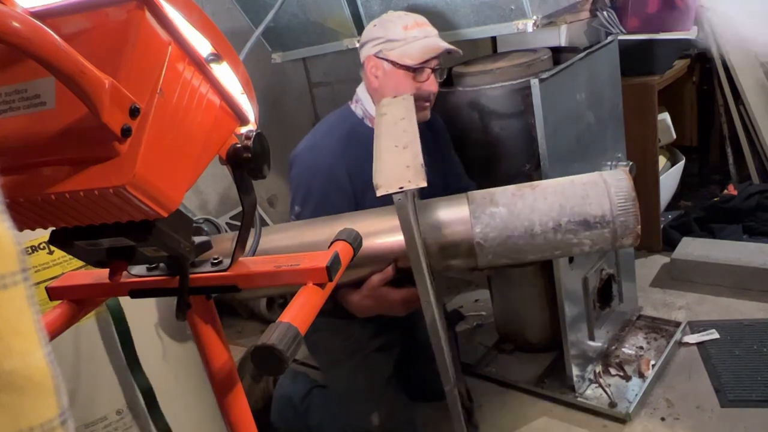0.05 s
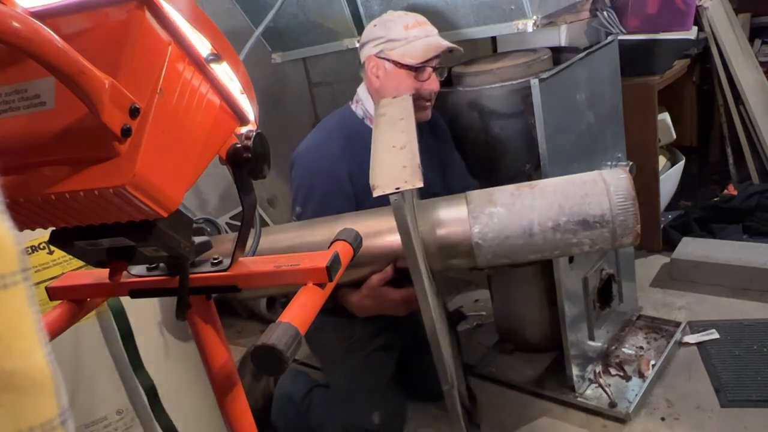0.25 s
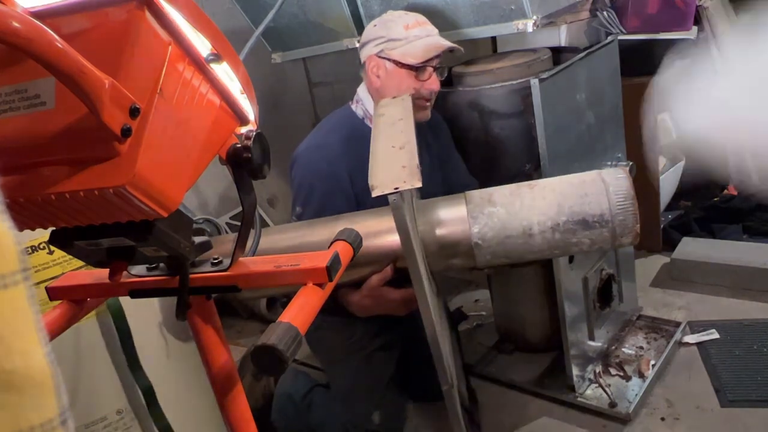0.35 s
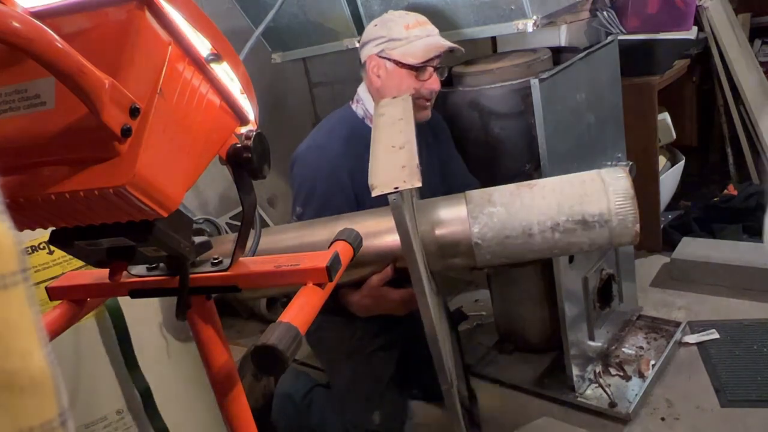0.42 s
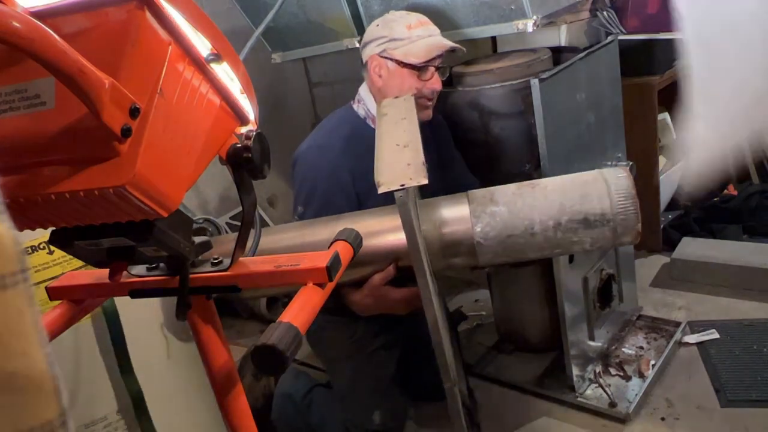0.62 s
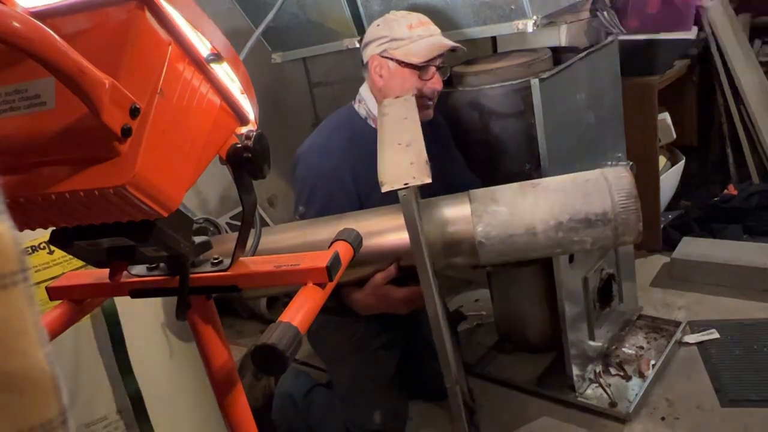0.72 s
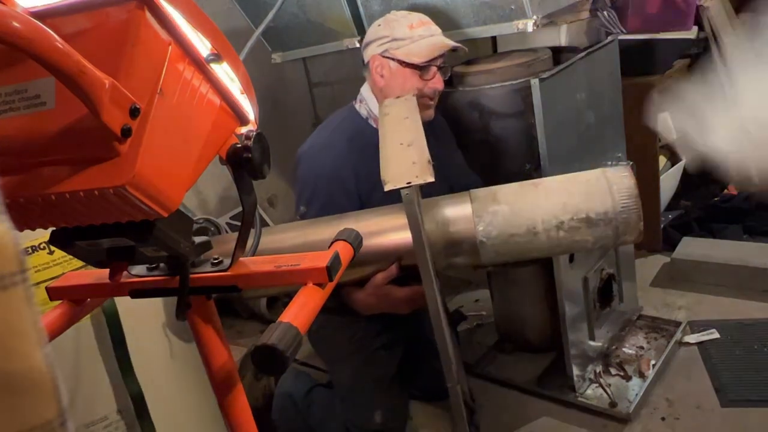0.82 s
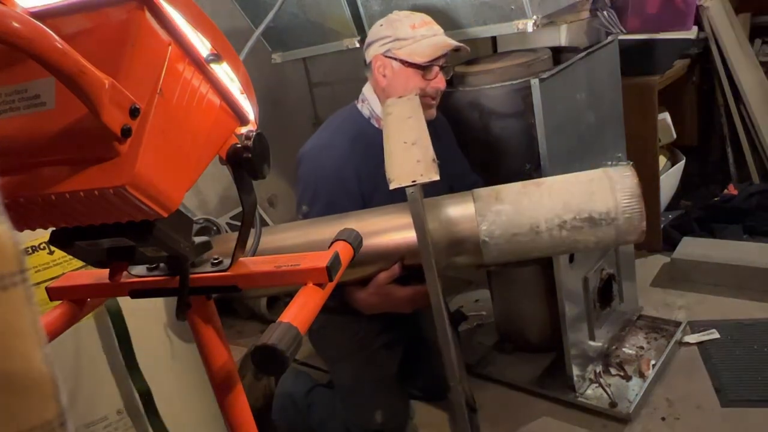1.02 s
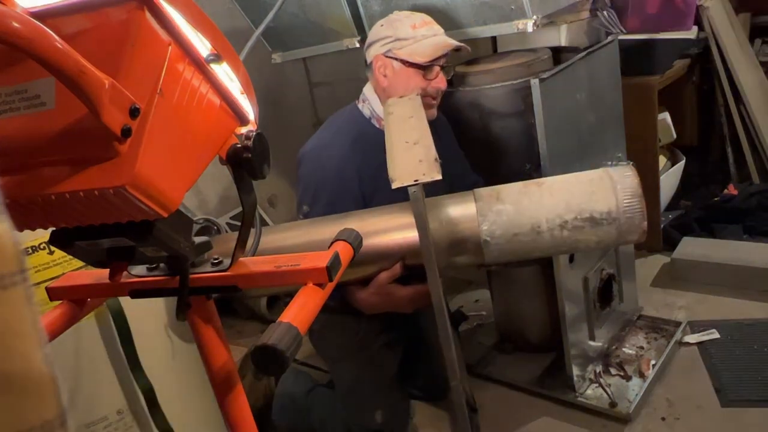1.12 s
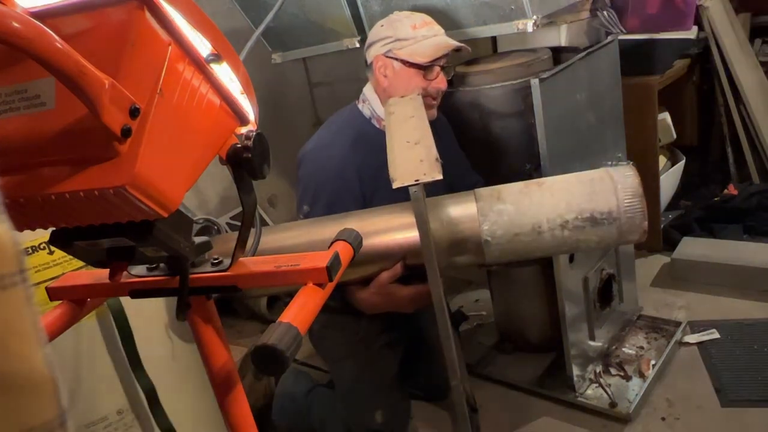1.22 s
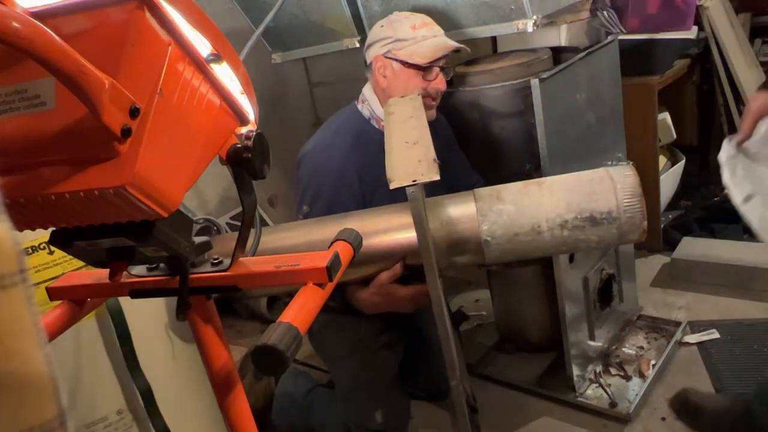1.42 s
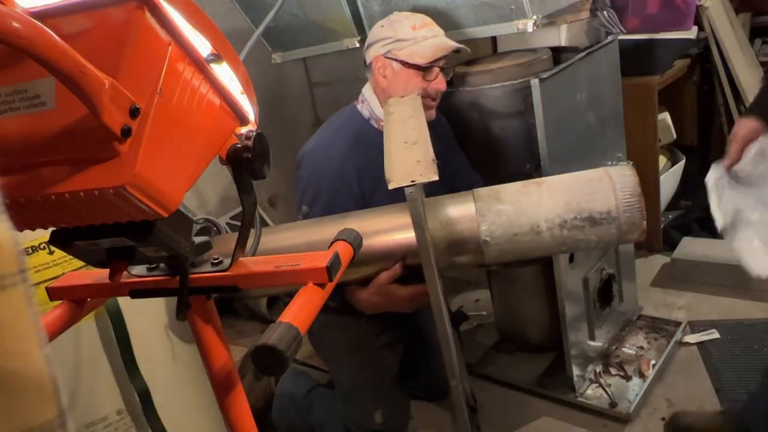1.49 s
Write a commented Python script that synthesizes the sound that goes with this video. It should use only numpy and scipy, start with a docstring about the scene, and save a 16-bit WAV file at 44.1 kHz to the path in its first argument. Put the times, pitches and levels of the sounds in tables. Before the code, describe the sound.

Two shoves on a stuck sheet-metal pipe joint: gritty scraping, a sharp crack, booming rattle, thin squeaking, another clatter, then a dull bump over low hum and light rustle, heard close in a small room.

```python
"""Over a low hum and a light rustle in a small basement, the joint of a stove pipe starts to scrape. A first
shove cracks it loose: the edges clash, the pipe knocks and rings, the thin wall booms. The joint squeaks
faintly and groans until a second shove sets off another crack and rattle. Last, the rustle starts to fade and a
soft bump follows. Slips are random impulses, clashes, cracks and rustle shaped noise, rings and booms damped
modes, thuds gliding sines, squeak and groans wavering ones."""
import sys
import numpy as np
from scipy import signal
from scipy.fft import rfft, irfft, next_fast_len
from scipy.io import wavfile
from scipy.ndimage import map_coordinates

SR = 44100
rng = np.random.default_rng(int(sys.argv[2]) if len(sys.argv) > 2 else 0)


def master(y):
    """Save y as 16-bit WAV."""
    cut = np.clip(np.atleast_2d(y).T, -1, 1)
    pcm = np.round(cut * 32767)  # scale
    wavfile.write(sys.argv[1], SR, pcm.astype(np.int16))


N = 68355  # samples


def amp(db):
    """Decibels to gain."""
    return 10 ** (np.asarray(db) / 20)


def unit(x):
    """Scaled to rms 1."""
    return x / np.sqrt(np.mean(x ** 2) + 1e-20)


def along(points, hz):
    """Values read off (frequency, value) points on a log frequency axis."""
    f, v = np.transpose(points)
    return np.interp(np.log(hz + 1), np.log(f + 1), v)


def curves(rows):
    """One value per sample for each column after the time."""
    s, *columns = np.transpose(rows)
    return [np.interp(np.arange(N) / SR, s, column) for column in columns]


def wobble(rate):
    """A continuous random curve, rate knots a second."""
    return map_coordinates(rng.standard_normal(4096), [np.arange(N) * rate / SR], mode="mirror")


def filtered(x, response):
    """x shaped by a response of frequency."""
    m = next_fast_len(N + SR // 2)
    hz = np.fft.rfftfreq(m, 1 / SR)
    return irfft(rfft(x, m) * response(hz), m)[..., :N]


# stereo width: (frequency [Hz], left-right likeness [0 to 1])
ALIKE = [(100, 0.96), (250, 0.87), (600, 0.24), (2000, 0.057), (4500, 0.24), (8000, 0.28), (13000, 0.88)]


def mid_side_gains(hz):
    """Mid and side gains that make left and right as alike as the table asks."""
    turn = np.arccos(np.clip(along(ALIKE, hz), -1, 1)) / 2
    return np.array([np.cos(turn), np.sin(turn)])


def stereo(pair, spectrum):
    """Two unrelated signals become a coloured, partly alike left and right of rms 1."""
    mid, side = filtered(pair, lambda hz: amp(along(spectrum, hz)) * mid_side_gains(hz))
    return unit(np.array([mid + side, mid - side]))


def noise(spectrum):
    """Coloured stereo noise of rms 1."""
    return stereo(rng.standard_normal((2, N)), spectrum)


def tail(x, t60s, count=12):
    """A dense ring, new for each stretch of sound; each frequency dies at its own speed."""
    out = np.zeros((2, N))
    for k in range(count + 1):
        # overlapping triangles cross-fade from one stretch to the next
        share = np.maximum(1 - np.abs(np.arange(N) * count / N - k), 0)
        hz, t, z = signal.stft(rng.standard_normal((2, SR // 3)), SR, nperseg=256)
        decay = amp(-60 * t / along(t60s, hz)[:, None])
        mid, side = signal.istft(z * mid_side_gains(hz)[:, :, None] * decay, SR, nperseg=256)[1]
        answer = np.array([mid + side, mid - side])
        answer = answer / np.linalg.norm(answer[0])
        inside = np.flatnonzero(share)
        start = inside[0]
        ring = signal.fftconvolve((x * share)[:, inside], answer, axes=1)[:, :N - start]
        out[:, start:][:, :ring.shape[1]] += ring
    return out


def bursts(blows, attack_s, hold_s, t60_s):
    """Joint envelope of (s, dB) blows, added in power: attack, hold, decay."""
    s, db = np.transpose(blows)[:, :, None]
    age = np.maximum(np.arange(N) / SR - s, 0)
    attack = 1 - np.exp(-age / attack_s)
    decay = amp(db - 60 * np.maximum(age - hold_s, 0) / t60_s)
    return np.linalg.norm(attack * decay, axis=0)


def thuds(blows, attack_s, t60_s, bend, settle_s):
    """Each (s, dB, Hz) blow is a few damped swings that start sharp and sag to their pitch."""
    out, t = np.zeros(N + SR), np.arange(SR // 4) / SR
    envelope = (1 - np.exp(-t / attack_s)) * amp(-60 * t / t60_s)
    for s, db, hz in blows:
        # the pitch starts at (1 + bend) times hz
        cycles = hz * (t + bend * settle_s * (1 - np.exp(-t / settle_s)))
        out[round(s * SR):][:len(t)] += amp(db) * envelope * np.sin(2 * np.pi * cycles)
    return out[:N]


def struck(blows, modes, attack_s, scatter_db, detune):
    """Each (s, dB) blow rings the modes anew, a little differently in level and pitch."""
    out, t = np.zeros(N + SR), np.arange(SR // 2) / SR
    hz, level, t60 = np.transpose(modes)[:, :, None]
    for s, db in blows:
        size, shift = rng.standard_normal((2, len(modes), 1))
        decay = amp(db + level + scatter_db * size - 60 * t / t60)
        ring = decay * np.sin(2 * np.pi * hz * (1 + detune * shift) * t)
        out[round(s * SR):][:len(t)] += ring.sum(0) * (1 - np.exp(-t / attack_s))
    return out[:N]


# sliding of the joint, before the contact gain: (time [s], level [dB])
SLIDE = [(0, -43), (.08, -44), (.106, -40), (.15, -45.5), (.195, -43.5), (.222, -30), (.246, -23),
         (.31, -30.5), (.375, -37.5), (.41, -37.5), (.52, -45.5), (.575, -45), (.6, -41), (.65, -51),
         (.69, -41.5), (.735, -32), (.76, -38), (.772, -25), (.815, -29), (.875, -43), (.955, -38),
         (1.04, -60.5), (1.15, -97)]
# colour of the scrape, bass then the rest: (frequency [Hz], relative level [dB per Hz])
SCRAPE_LOW = [(40, -12), (120, -10), (250, -3.5)]
SCRAPE = [(500, -2.5), (1100, -1), (2000, -2), (3300, -5), (5500, -3.5), (8000, -4.5), (12000, -11.5)]
SLIPS_PER_S, SLIP_SPREAD_DB = 6000, 3
JUDDER_DB, JUDDER_PER_S = 1.2, 110


def scrape():
    """The joint slides in thousands of tiny slips, juddering as it goes; it has little bass."""
    level_db, = curves(SLIDE)
    slip_size = amp(SLIP_SPREAD_DB * rng.standard_normal(N))
    slips = (rng.random(N) < SLIPS_PER_S / SR) * slip_size
    grit = stereo(slips * rng.standard_normal((2, N)), SCRAPE_LOW + SCRAPE)
    return grit * amp(level_db + JUDDER_DB * wobble(JUDDER_PER_S))


# metal-on-metal knocks; the clash comes before the contact gain:
# (time [s], clash of the edges [dB], thud of the wall [dB], settled thud pitch [Hz])
KNOCKS = [(0.098, -42, -34.5, 276), (.2, -43, -31, 199), (.2535, -23, -9, 270), (.2665, -25, -12, 190),
          (0.291, -25, -30, 243), (.301, -32, -16, 205), (.312, -28, -15, 210), (.329, -33, -15, 200),
          (.345, -32, -28, 300), (0.361, -32.5, -24, 276), (.39, -36.5, -27, 322), (.414, -40.5, -23, 197),
          (.46, -39, -27, 278), (0.481, -42, -28, 195), (.588, -38, -34, 230), (0.713, -32, -32, 216),
          (.73, -29, -13.5, 326), (.739, -29, -17, 272), (0.756, -32, -22, 293), (.7688, -23, -14, 205),
          (.7805, -31.5, -9.5, 190), (.8, -24.5, -24, 198), (0.8055, -32, -17, 220),
          (.827, -25, -20.5, 355), (.8325, -34, -12, 210), (0.858, -56, -23.5, 260),
          (0.92, -37.5, -48, 259), (.953, -42, -32.5, 278), (.97, -61, -31.5, 189)]
# colour of the clash, bass then the rest: (frequency [Hz], relative level [dB per Hz])
CLASH_LOW = [(60, -28), (130, -26), (190, -2), (280, 0)]
CLASH = [(500, 4), (1200, -1.5), (2200, -3.5), (4000, -5), (7000, -8), (12000, -16)]


def clashes():
    """At each knock the loose edges chatter for a moment and settle."""
    blows = [(s, clash_db) for s, clash_db, _, _ in KNOCKS]
    return bursts(blows, attack_s=.0005, hold_s=.0079, t60_s=.073) * noise(CLASH_LOW + CLASH)


# dense upper modes of the wall: (frequency [Hz], t60 [s])
SHEET_T60 = [(200, 0.37), (1500, 0.056), (6000, 0.23), (15000, 0.047)]


def sheet_ring(contact):
    """Scrape and clashes set the sheet shimmering in a dense ring of upper modes."""
    return amp(-4) * tail(contact, SHEET_T60)


# modes of the pipe: (frequency [Hz], relative level [dB], t60 [s])
PIPE = [(176.1, 1.5, 0.2), (203, -9, 0.477), (262.6, -3, 0.17), (296.5, -16.5, 0.46), (445, -4.5, 0.21),
        (593.8, -13.5, 0.25), (744, -12.5, 0.28), (790, -15, 0.35), (1036, -10.5, 0.23), (1155, -17, 0.39),
        (1247.4, -2.5, 0.13), (1500, -12, 0.1), (1880, -20, 0.25), (2270, -18, 0.19)]
# the wall flexes: (time [s], level [dB])
FLEXES = [(.07, -39.5), (.28, -33), (.311, -28), (.328, -36), (.366, -26.5), (.416, -32), (.47, -32),
          (.51, -37), (.711, -29), (.735, -23), (.748, -19.5), (.779, -24), (.798, -16), (.843, -14),
          (.9, -45), (.95, -32.5), (.97, -34), (1.04, -42)]
# low modes of the flexing wall: (frequency [Hz], relative level [dB], t60 [s])
BOOM = [(64.7, -1.5, 0.063), (81.7, -1.5, 0.12), (110, -1.5, 0.062)]
THUD_LAG_S = .002  # thud and ring after the clash
RING_DB = -16  # ring of the pipe relative to its thud


def pipe_body():
    """Each knock dents the wall with a thud and rings the pipe; the wall booms as it flexes."""
    blows = [(s + THUD_LAG_S, thud_db, hz) for s, _, thud_db, hz in KNOCKS]
    thud = thuds(blows, attack_s=.0012, t60_s=.045, bend=.45, settle_s=.003)
    hits = [(s, db) for s, db, _ in blows]
    ring = amp(RING_DB) * struck(hits, PIPE, attack_s=.002, scatter_db=2.5, detune=.012)
    boom = struck(FLEXES, BOOM, attack_s=.0048, scatter_db=3, detune=.077)
    return ring + thud + boom


# the joint lets go at the height of each shove: (time [s], level [dB])
CRACKS = [(.2536, -11.3), (.772, -20)]
# colour of the crack: (frequency [Hz], relative level [dB per Hz])
CRACK = [(100, -16), (280, -5), (500, -1.5), (900, 4), (1400, 4.5), (2400, 0), (4000, -6), (8000, -5.5),
         (15000, -12.5)]


def cracks():
    """Short, hard snaps of the sheet as the stuck joint gives way: noise that stops almost at once."""
    return bursts(CRACKS, attack_s=.0002, hold_s=.005, t60_s=.015) * noise(CRACK)


# squeak of the joint: (time [s], pitch [Hz], level [dB])
SQUEAK = [(.39, 805, -54), (.43, 836, -43), (.452, 805, -46), (.485, 848, -44.5), (.53, 840, -44),
          (.59, 822, -43), (.612, 812, -46), (.635, 828, -44.5), (.68, 820, -48), (.72, 810, -54)]
SQUEAK_WAVER, SQUEAK_FLUTTER_DB = .028, 1.7  # waver as a share of the pitch


def squeak():
    """A thin, unsteady tone between the shoves, where the metal sticks and slips."""
    hz, level_db = curves(SQUEAK)
    t = np.arange(N) / SR
    phase = 2 * np.pi * np.cumsum(hz * (1 + SQUEAK_WAVER * wobble(260))) / SR
    sounding = (t > SQUEAK[0][0]) * (t < SQUEAK[-1][0])
    return sounding * np.sin(phase) * amp(level_db + SQUEAK_FLUTTER_DB * wobble(87.4))


# short groans of the joint: (time of the peak [s], half-length [s], pitch [Hz], level [dB])
GROANS = [(.188, .012, 265, -34.5), (.207, .007, 810, -35), (.555, .02, 255, -44), (.69, .02, 660, -48),
          (.741, .014, 715, -27), (.956, .012, 875, -35), (.958, .01, 1050, -34)]
GROAN_WAVER = .06  # share of the pitch


def groans():
    """Brief rough tones as the joint binds: wavering sines that swell and fade."""
    t = np.arange(N) / SR
    out = np.zeros(N)
    for s, half_s, hz, db in GROANS:
        phase = 2 * np.pi * np.cumsum(hz * (1 + GROAN_WAVER * wobble(300))) / SR
        swell = np.exp(-((t - s) / half_s) ** 2)
        out += amp(db) * swell * np.sin(phase)
    return out


# a soft bump and its rebounds: (time [s], thump level [dB], settled pitch [Hz])
BUMPS = [(1.4338, -22, 175), (1.4585, -32, 200), (1.471, -38, 215)]
# colour of the dull tap: (frequency [Hz], relative level [dB per Hz])
BUMP_TAP = [(90, 5), (200, 1), (450, 3), (750, -3), (1000, -10), (1350, -6), (1900, -8), (2400, -24),
            (8000, -50)]
TAP_DB = -16.5  # tap relative to the thump level


def bump():
    """A soft bump after the pipe has come to rest: a dull tap and a falling thump."""
    blows = [(s, db) for s, db, _ in BUMPS]
    tap = amp(TAP_DB) * bursts(blows, attack_s=.001, hold_s=0, t60_s=.06) * noise(BUMP_TAP)
    thump = thuds(BUMPS, attack_s=.008, t60_s=.047, bend=1.6, settle_s=.0036)
    return tap + thump


# reverberation of the basement: (frequency [Hz], t60 [s])
ROOM_T60 = [(100, 0.58), (1000, 0.53), (12000, 0.38)]


def room(dry):
    """The close walls answer with a diffuse tail."""
    return amp(-18) * tail(dry, ROOM_T60)


# colour of the still air: (frequency [Hz], relative level [dB per Hz])
FLOOR = [(20, -31), (55, 8.5), (100, 4.5), (200, -8), (500, -13), (1500, -10.5), (16000, -27)]
# colour of the rustle: (frequency [Hz], relative level [dB per Hz])
RUSTLE = [(300, 9.5), (1000, 2), (2800, 4), (6000, 9.5), (9000, 1.5), (16000, -6.5)]
HUM_HZ, HUM_DB, FLOOR_DB = 56.5, -59.5, -58.5
RUSTLE_DB, RUSTLE_SWING_DB = -55.5, 2.16
RUSTLE_FADE_S, RUSTLE_FADE_DB_PER_S = 1.366, 24  # start and speed of the fade


def background():
    """Steady low hum, still air and a light rustle of handling that starts to fade near the end."""
    t = np.arange(N) / SR
    hum = amp(HUM_DB) * unit(np.sin(2 * np.pi * HUM_HZ * t + .12 * wobble(8.4)))
    air = amp(FLOOR_DB) * noise(FLOOR)
    fade_db = RUSTLE_FADE_DB_PER_S * np.maximum(t - RUSTLE_FADE_S, 0)
    rustle_db = RUSTLE_DB + RUSTLE_SWING_DB * wobble(51.64) - fade_db
    return hum + air + amp(rustle_db) * noise(RUSTLE)


# stereo balance: (frequency [Hz], left minus right [dB])
BALANCE = [(100, 2), (250, 1.5), (600, -3), (1200, -1.5), (2500, -2), (4800, 3.5), (8000, 4), (13000, -3)]
LEFT_LAG_S, LAG_UP_TO_HZ = .00016, 12400  # above this the phase offset stays constant
CONTACT_DB = 3.5  # gain of scrape, clashes and sheet ring


def placed(sound):
    """Level and arrival time are split between the ears, half to each side; the left lags."""
    sides = np.array([[.5], [-.5]])

    def response(hz):
        lag_cycles = np.minimum(hz, LAG_UP_TO_HZ) * sides * LEFT_LAG_S
        return amp(sides * along(BALANCE, hz)) * np.exp(-2j * np.pi * lag_cycles)

    return filtered(sound, response)


def scene():
    """The pipe lies a little to the right, between close walls."""
    contact = scrape() + clashes()
    metal = amp(CONTACT_DB) * (contact + sheet_ring(contact))
    dry = metal + cracks() + pipe_body() + squeak() + groans() + bump()
    return placed(dry + room(dry) + background())


def record(dry):
    """The microphone loses the deepest bass and everything above its band limit."""
    low_cut = signal.butter(4, 42, "high", fs=SR, output="sos")
    return filtered(signal.sosfilt(low_cut, dry), lambda hz: hz < 16000)


dry = scene()
out = record(dry)
master(out)
```